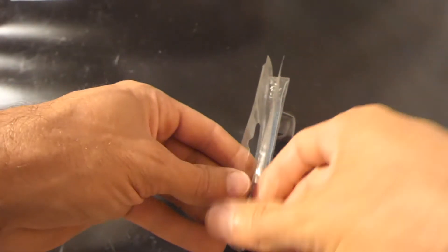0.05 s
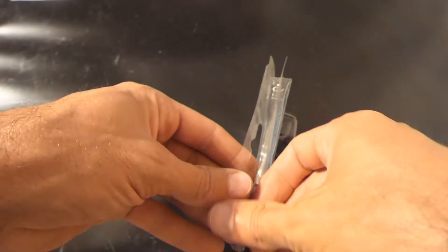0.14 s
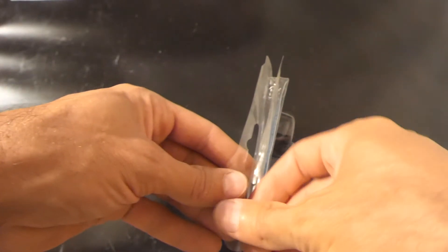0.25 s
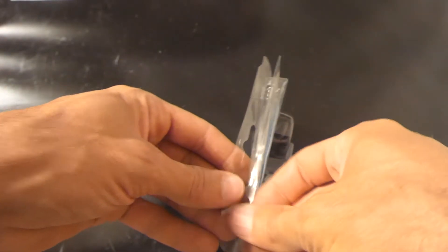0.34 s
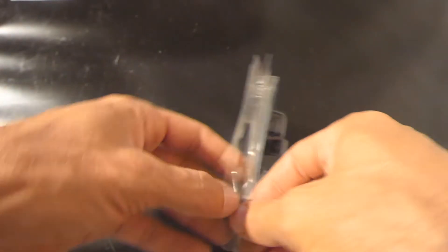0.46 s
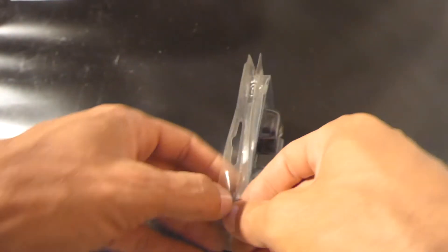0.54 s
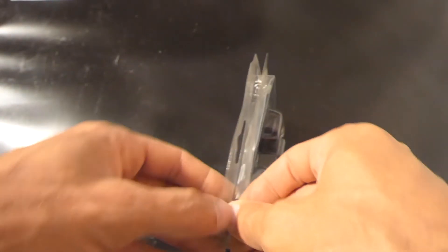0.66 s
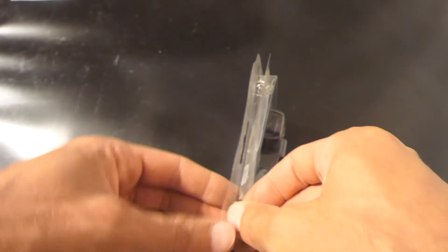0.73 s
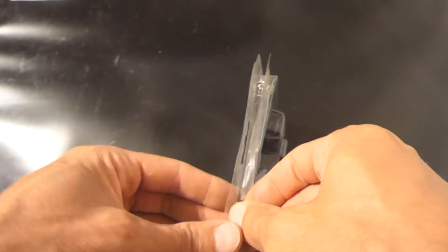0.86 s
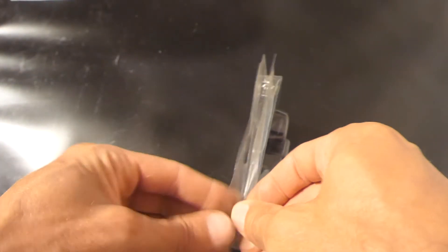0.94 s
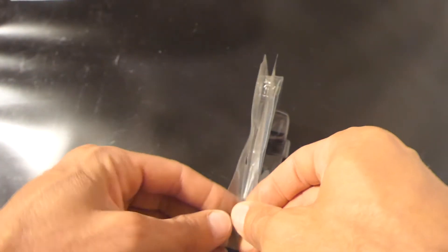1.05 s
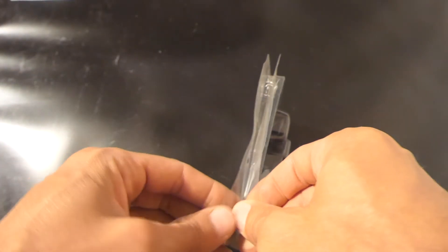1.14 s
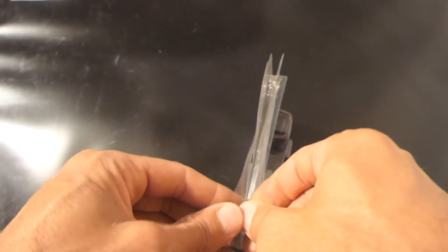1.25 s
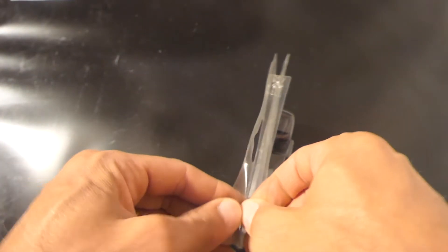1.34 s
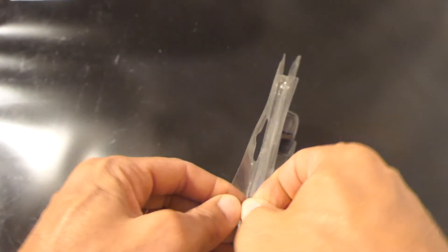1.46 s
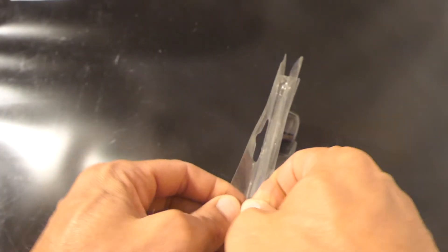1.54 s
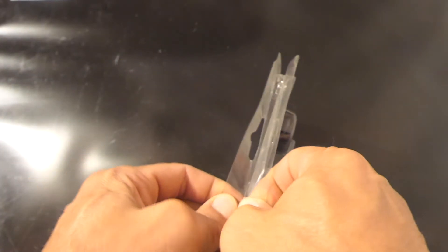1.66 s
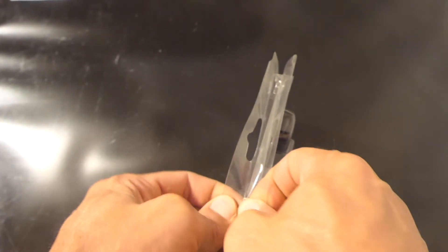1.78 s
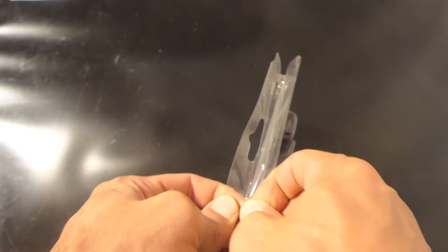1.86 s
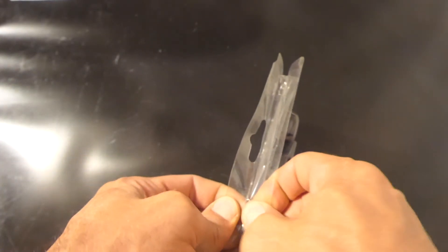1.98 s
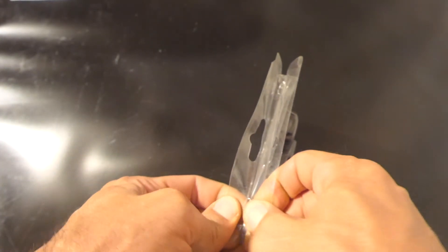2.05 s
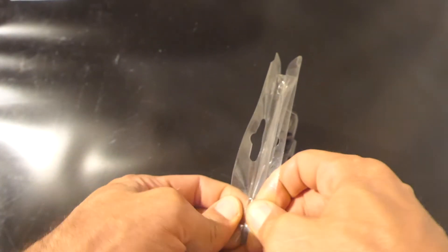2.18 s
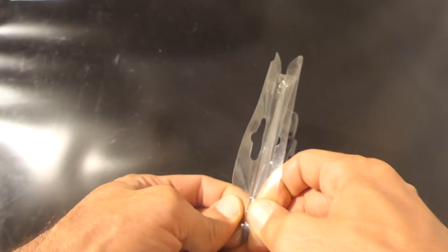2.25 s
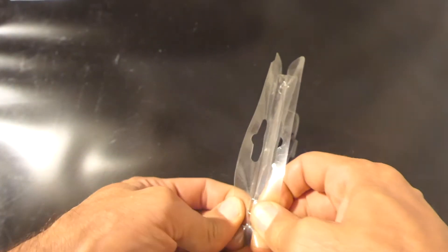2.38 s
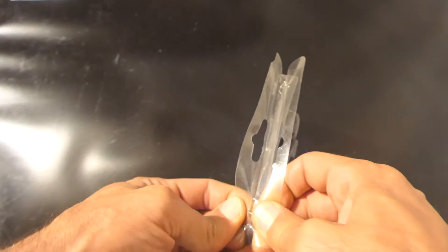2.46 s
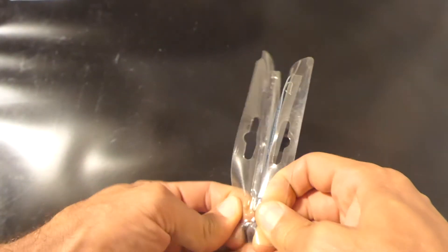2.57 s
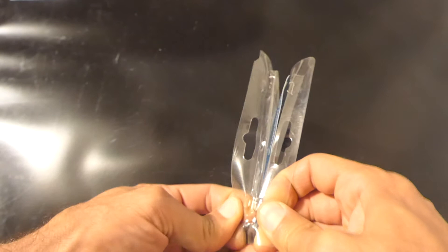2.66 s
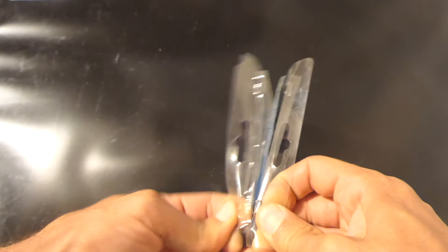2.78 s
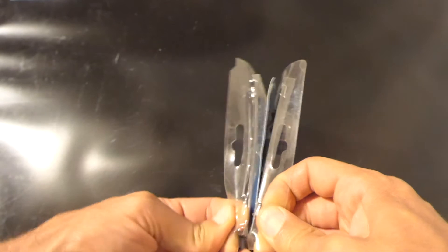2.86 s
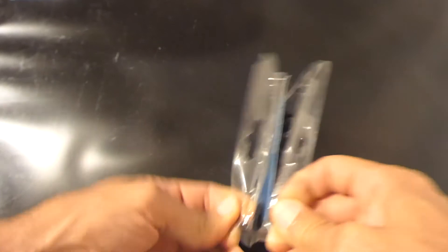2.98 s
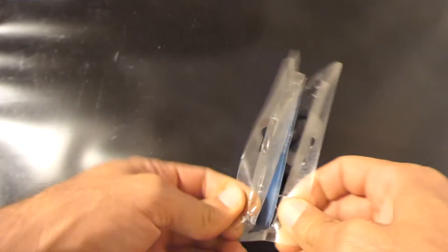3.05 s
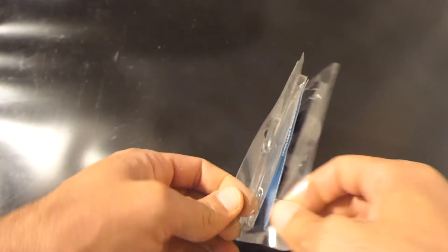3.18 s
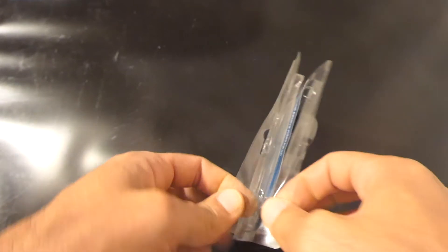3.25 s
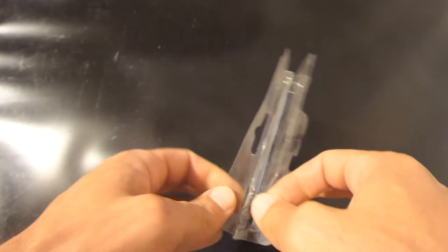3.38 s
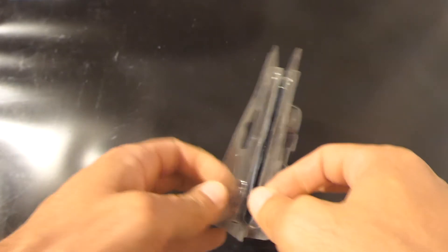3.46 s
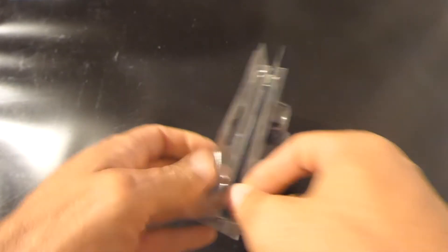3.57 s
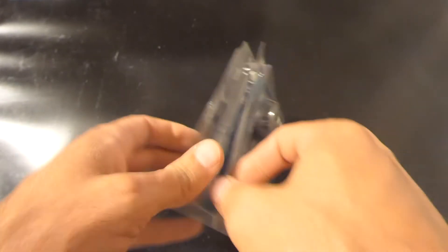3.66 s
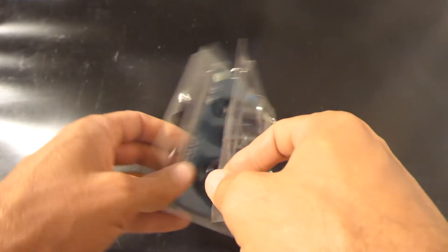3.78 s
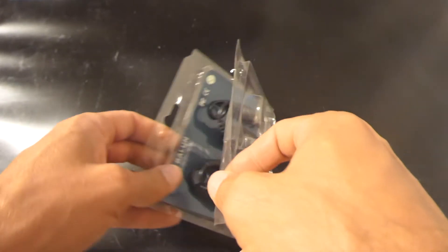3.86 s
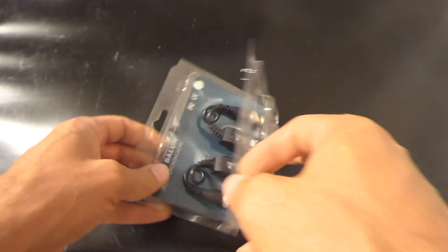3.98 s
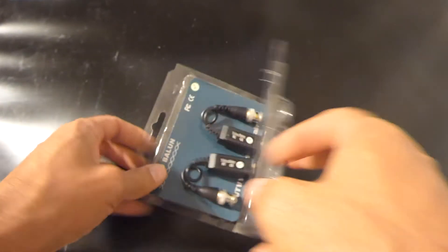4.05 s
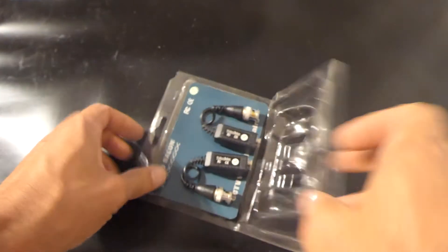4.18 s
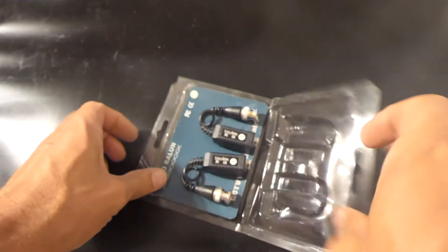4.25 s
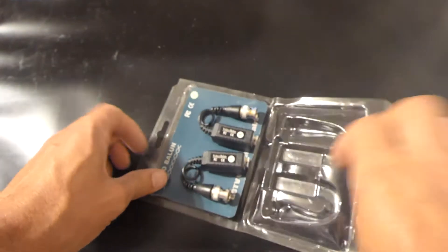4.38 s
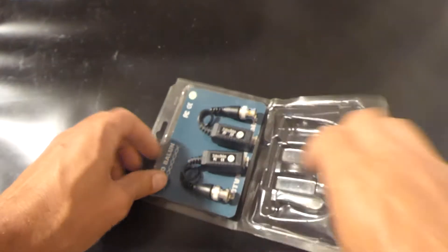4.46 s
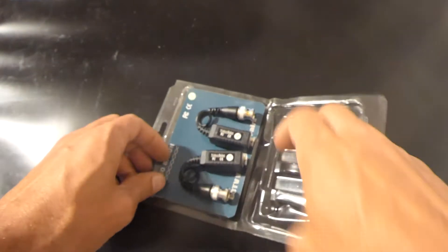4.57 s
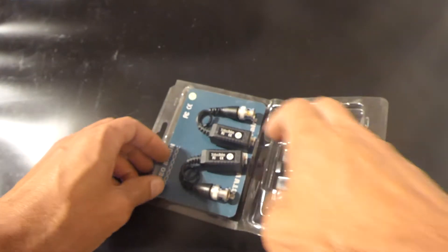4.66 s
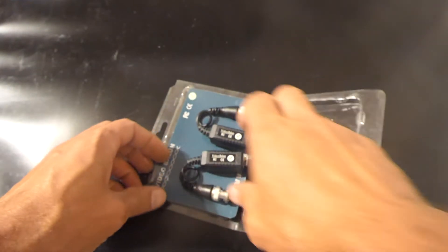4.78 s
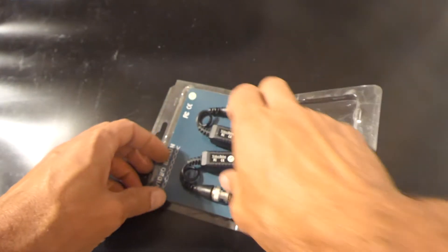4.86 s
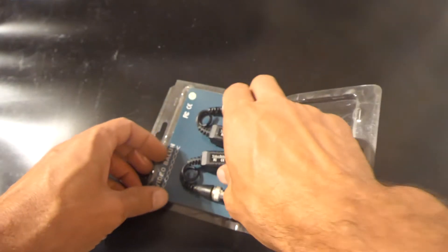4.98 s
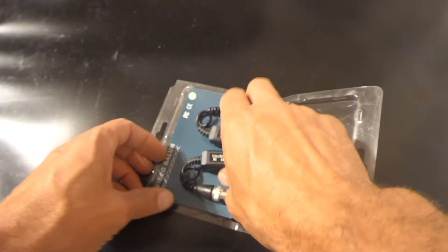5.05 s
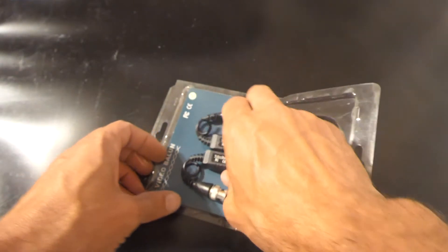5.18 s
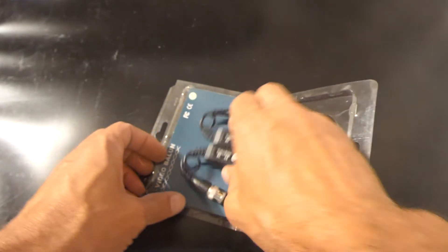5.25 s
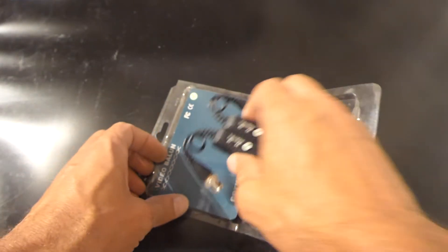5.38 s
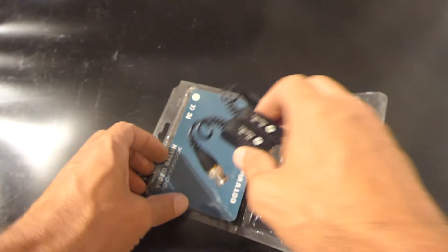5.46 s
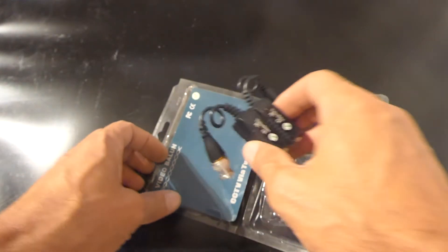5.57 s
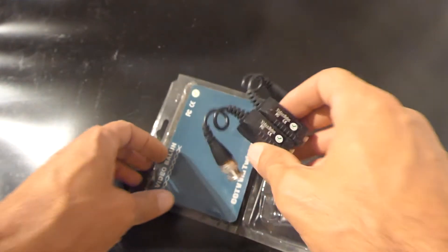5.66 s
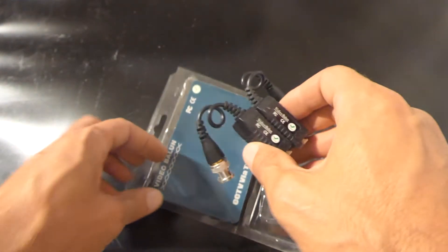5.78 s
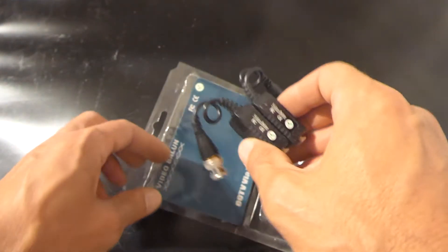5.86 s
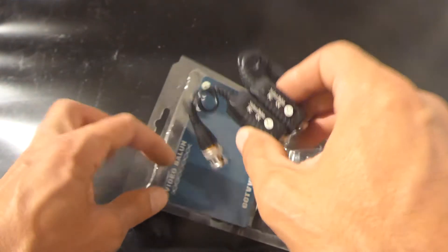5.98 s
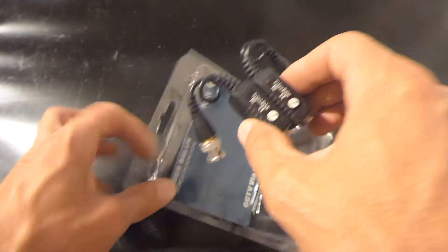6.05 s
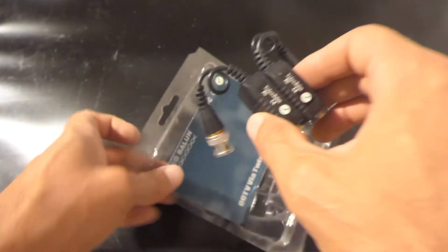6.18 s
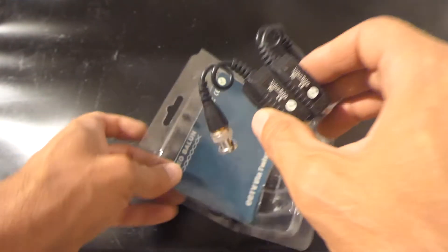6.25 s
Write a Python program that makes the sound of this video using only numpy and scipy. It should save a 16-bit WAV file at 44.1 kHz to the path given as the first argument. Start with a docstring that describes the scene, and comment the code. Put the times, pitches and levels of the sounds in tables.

```python
"""Two hands pry open a clear plastic blister pack over a table, close up in a small, softly rushing room.
First fingers slide and tap on the shut pack, drawing its hollow tone, and nudge it against the table.
The film crinkles, an edge drags, and from about 2 s the press studs let go with sharp snaps.
At 2.7 s the lid opens and the hollow tone goes up an octave; scrapes, taps and knocks grow busier as a
part is pulled from its tray, ending on a snap at 6.2 s. The thin shell colours every snap and scrape."""
import sys
import numpy as np
from scipy import signal
from scipy.fft import rfft, irfft, next_fast_len
from scipy.io import wavfile
from scipy.ndimage import uniform_filter1d, map_coordinates

SR = 44100
rng = np.random.default_rng(int(sys.argv[2]) if len(sys.argv) > 2 else 0)


def put_to_file(sound):
    """Save the sound as 16-bit audio at rate SR, in the file named by the first command-line argument."""
    columns = np.atleast_2d(sound).T  # one column per channel
    safe = np.clip(columns, -1, 1)
    whole_steps = np.round(safe * 32767)
    wavfile.write(sys.argv[1], SR, whole_steps.astype(np.int16))


N = 278712

# tone curves of room air, plastic scrape, skin hiss and table shuffle: freq_hz, level_db
AIR_SPECTRUM = [(25, -27.5), (80, -16.5), (150, -17), (270, -12), (520, -12.5), (740, -10.5), (1180, -13),
                (1500, -17.5), (2200, -23), (6000, -43.5), (11000, -28.5), (16000, -36)]
SCRAPE_SPECTRUM = [(300, -15.5), (550, -23), (780, -4), (1200, 1.5), (1650, 3), (2400, -1.5), (3300, -5),
                   (6000, -11), (12000, -43.5)]
SKIN_SPECTRUM = [(1200, -35), (2500, -2.5), (3500, -4), (5500, 1.5), (7500, -4), (9800, -2.5),
                 (12500, -12.5), (15000, -19), (16500, -28.5)]
SHUFFLE_SPECTRUM = [(25, -38.5), (55, -31), (80, -10), (115, -4.5), (150, 2), (210, 1.5), (290, -7),
                    (370, 1.5), (480, -20.5), (700, -2.5), (1500, -61.5)]
# strokes of plastic on plastic, skin on film, pack on table and pinched film: start_s, length_s, level_db
SCRAPES = [(0.0, 0.097, -61), (0.32, 0.036, -57.5), (0.42, 0.35, -67), (1.14, 0.077, -58),
           (1.42, 0.21, -67), (1.65, 0.065, -62.5), (2.05, 0.32, -62.5), (2.7, 0.21, -56.5),
           (2.94, 0.086, -52.5), (3.3, 0.076, -50), (3.39, 0.24, -60), (3.72, 0.072, -45.5),
           (4.0, 0.42, -57.5), (4.188, 0.039, -34.5), (4.475, 0.066, -46.5), (4.55, 0.062, -47),
           (4.64, 0.19, -58), (4.8, 1, -64), (5.29, 0.22, -55), (5.73, 0.3, -55.5), (5.95, 0.06, -45.5),
           (6.05, 0.26, -52)]
SLIDES = [(0.0, 0.14, -62), (0.325, 0.054, -58), (0.4, 0.11, -61.5), (0.595, 0.053, -58.3),
          (0.705, 0.059, -58.5), (0.955, 0.044, -57), (1.14, 0.086, -58), (1.29, 0.046, -64),
          (1.41, 0.37, -73), (2.78, 0.33, -57.5), (3.28, 0.094, -56), (3.51, 0.1, -63), (3.735, 0.053, -49),
          (3.93, 0.32, -57.5), (4.495, 0.049, -49.5), (4.55, 0.085, -50.5), (4.62, 0.21, -63.5),
          (5.3, 0.17, -58.5), (5.63, 0.29, -63.5), (5.92, 0.1, -50.5), (6.06, 0.075, -54.5)]
SHUFFLES = [(0.32, 0.075, -62.5), (1.14, 0.11, -61.5), (1.29, 0.11, -65), (1.52, 0.28, -70.5),
            (2.7, 0.47, -63.5), (2.97, 0.087, -59), (3.11, 0.15, -61.5), (3.3, 0.13, -62.5),
            (3.75, 0.33, -70), (4.21, 0.15, -60), (4.52, 0.17, -58.5), (5.1, 0.13, -65),
            (6.07, 0.27, -57.5)]
CRINKLES = [(1.3, 0.26, -69.5), (1.66, 0.14, -67.5), (2.94, 0.073, -49), (3.745, 0.057, -45),
            (4.04, 0.23, -57.5), (4.49, 0.14, -50.5), (6.0, 0.18, -54.5)]
# resonances of the thin shell: pitch_hz, width_hz, level_db
SHELL_MODES = [(757, 93, 4), (1236, 55, 4), (1550, 22, 2), (2183, 180, 1), (2410, 55, -1.5),
               (2938, 93, 3.5), (3400, 270, -3), (4050, 180, 1.5), (4600, 110, -1), (4920, 320, -2),
               (5740, 580, -4.5), (9720, 500, -1.5)]
# the pack knocks on the table: start_s, push_db, favoured_hz
KNOCKS = [(0.041, -51.5, 336), (0.329, -57, 143), (0.335, -55.5, 400), (1.143, -43.5, 163),
          (2.559, -35, 210), (2.59, -39, 165), (3.048, -44, 100), (3.334, -44.5, 239), (3.727, -47, 368),
          (3.815, -45.5, 259), (3.905, -47.5, 230), (4.199, -44, 221), (4.304, -53, 243), (4.489, -39, 95),
          (4.547, -42, 213), (4.584, -41.5, 115), (6.108, -48, 187), (6.238, -40, 130)]
# low modes of the pack lying on the table: pitch_hz, level_db, t60_s
KNOCK_MODES = [(78, -11, 0.16), (110, -6.5, 0.053), (144.4, -3, 0.26), (193, -0.5, 0.13),
               (227.8, -1.5, 0.15), (257.2, 1, 0.12), (305, -1.5, 0.13), (376, 0, 0.21), (397.6, 1.5, 0.15)]
# a finger or the lid taps the shell: start_s, level_db, crack_db
TAPS = [(0.043, -45, -19.5), (0.328, -56, -23), (0.5928, -52, -7), (1.063, -46.5, 5), (1.146, -41, -27),
        (1.3622, -54.5, -11), (1.685, -51.5, -20), (1.736, -57, -25), (1.762, -63, -14),
        (1.7887, -53.5, -7), (1.814, -56.5, -10), (2.089, -50.5, -18), (3.145, -43, -20),
        (3.1716, -38.5, -34), (3.338, -44, -14), (3.526, -47, -19), (3.575, -46, -15.5), (3.7468, -39, -20),
        (3.8253, -33.5, -26), (3.9062, -35, -30), (3.911, -38, -36), (4.201, -29.5, -25),
        (4.3055, -41.5, -44), (4.4876, -40, -29), (4.5, -40, -15), (4.5469, -38, -20), (4.5621, -29, -19),
        (4.603, -34, -19.5), (4.659, -43, -27), (4.977, -52.5, -31), (5.6724, -51.5, -26),
        (5.9644, -44, -28), (6.012, -39, -29), (6.055, -46, -14), (6.102, -39, -11.5), (6.2172, -43, -13),
        (6.2355, -28.5, -15)]
# the sheet buckles or a stud lets go: start_s, level_db, pitch_hz, half_width_octaves, crack_db, t60_s
SNAPS = [(0.141, -50, 1980, .36, -6, 0.033), (0.311, -53, 4000, 2.3, 5, 0.0052),
         (1.132, -50, 7340, 0.55, -13, 0.0056), (1.1406, -40, 1740, 0.45, -17, 0.045),
         (1.942, -51.5, 1530, 0.65, -38, 0.01), (1.9734, -30, 2300, 0.59, -10, 0.022),
         (2.1642, -49, 1560, 1.1, -41, 0.01), (2.2325, -50.5, 1490, 1.5, -32, 0.0043),
         (2.2752, -41.5, 5700, 0.96, -4.5, 0.023), (2.544, -41, 5880, 1.1, 7, 0.11),
         (2.5576, -20.5, 4050, 0.94, -15, 0.016), (2.562, -22, 4470, 0.067, -21, .006),
         (2.572, -30, 9650, .6, -12, .004), (2.558, -21, 9600, 0.44, -20, 0.0015),
         (2.5591, -19.5, 1430, 3.4, -25.5, 0.011), (2.7463, -32.5, 2000, 0.8, -12.5, 0.017),
         (2.765, -33, 3100, 0.86, -8, 0.0031), (2.862, -42.5, 9000, 0.52, -7, 0.0039),
         (2.873, -39, 3660, 0.089, -13, 0.018), (2.928, -40, 4140, 0.42, -5, 0.011),
         (3.033, -32, 3500, 1.5, -20, 0.014), (3.0484, -17, 4000, 0.31, -24.5, 0.006),
         (3.0487, -20.5, 2040, 0.27, -34, 0.032), (3.2126, -30, 3800, 0.45, -15.5, 0.0082),
         (3.288, -42.5, 2140, 1.7, -40, 0.005), (3.4034, -36, 3320, 1.14, -29, 0.0027),
         (3.722, -42.5, 1890, 4.7, -37, 0.006), (3.815, -28, 1280, 0.8, -17.5, 0.0041),
         (3.8308, -32.5, 5200, 3.3, -12, 0.0048), (3.9078, -41, 3170, 0.15, -20, 0.012),
         (3.9098, -45.5, 706, 0.14, -30, 0.017), (4.1985, -27, 1880, 1.36, -32, 0.027),
         (4.2063, -36, 1090, 0.29, -22, 0.014), (4.337, -37.5, 3020, 1.15, -32, .004),
         (5.112, -49.5, 4000, 1.7, -16.5, .01), (5.1167, -36.5, 1710, 1.94, -32, 0.0051),
         (5.161, -29, 5240, 2.7, -20, 0.0029), (5.1602, -38, 1120, 0.36, -27, 0.0041),
         (5.977, -34.5, 1500, 0.42, -18, 0.016), (5.977, -35.5, 5300, 0.17, -20, 0.011),
         (6.2363, -24.5, 4470, 0.57, -12, 0.018)]
# an edge drags and rings: start_s, length_s, level_db, pitch_hz, width_hz
DRAGS = [(1.979, 0.045, -47, 2550, 262), (3.758, 0.17, -51, 1640, 240), (4.03, 0.14, -55, 1510, 260),
         (5.655, 0.17, -58.5, 1590, 150), (5.74, 0.2, -63, 2680, 380), (6.011, 0.02, -45, 3270, 120)]
# where the fingers work: time_s, left_minus_right_db
PAN = [(0, -4), (1.1, -3), (2.0, -4.5), (2.55, -2.2), (3.05, -3.5), (3.7, 0), (4.3, -2.5), (6.3, 0.8)]
# decay of the room: freq_hz, t60_s
ROOM_DECAY = [(150, 0.23), (400, 0.13), (1040, 0.22), (2760, 0.21), (7280, 0.22), (15000, 0.058)]
# tone of the room's tail: freq_hz, gain_db
ROOM_TONE = [(150, 1.5), (500, 3.5), (1200, -3.5), (2500, -2.5), (4200, -3.5), (7000, -3.5), (11000, -0.5),
             (16000, -1.5)]
# how alike left and right are in diffuse sound: freq_hz, correlation
STEREO_LIKENESS = [(40, 0.42), (130, 0.21), (1400, 0.22), (4000, 0.53), (8000, 0.5), (14000, 0.27)]

# hollow tone of the shut pack and the open tray: pitch_hz, width_hz, boost_db
SHUT, OPEN = (800, 400, 10.6), (1603, 100, 6.5)
OPENS_AT_S = 2.7
# the sheet heard from one side and all round: even_band_hz, dense_db, blur_octaves, smear_s, clean_db
ONE_SIDE, ALL_ROUND = (1200, -4.5, 0, 0, -23.5), (100, 4.5, 0.3, 0.1245, -1)


def amp(db):
    """Decibels to gain."""
    return 10 ** (np.asarray(db) / 20)


def unit(x):
    """Scale to rms 1."""
    return x / np.sqrt(np.mean(x ** 2) + 1e-20)


def along(points, hz):
    """Read a curve on a log frequency axis."""
    freqs, values = np.transpose(points)
    return np.interp(np.log(hz + 1), np.log(freqs + 1), values)


def wobble(rate_hz):
    """A smooth random modulator."""
    return map_coordinates(rng.standard_normal(int(N * rate_hz / SR) + 4), [np.arange(N) * rate_hz / SR])


def add(out, start_s, wave):
    """Mix a short wave into a track."""
    span = out[round(start_s * SR):][:len(wave)]
    span += wave[:len(span)]


def filtered(x, response):
    """Equalise x with a gain that depends on frequency."""
    size = next_fast_len(x.shape[-1] + SR // 4)
    return irfft(rfft(x, size) * response(np.fft.rfftfreq(size, 1 / SR)), size)[..., :x.shape[-1]]


def causal(gain):
    """The minimum-phase response with this gain: nothing sounds before the blow."""
    cepstrum = irfft(np.log(np.maximum(gain, 1e-6)))
    half = len(cepstrum) // 2
    cepstrum[1:half] *= 2
    cepstrum[half + 1:] = 0
    return np.exp(rfft(cepstrum))


def coloured(x, gain, size=8192):
    """Colour x without pre-ringing, rms 1."""
    response = irfft(causal(gain(np.fft.rfftfreq(size, 1 / SR))))
    return unit(signal.oaconvolve(x, response)[:N])


def spread(pair):
    """Turn two unrelated signals into left and right of a diffuse sound."""
    angle = lambda hz: np.arccos(np.clip(along(STEREO_LIKENESS, hz), -1, 1)) / 2
    mid, side = filtered(pair, lambda hz: np.array([np.cos(angle(hz)), np.sin(angle(hz))]))
    return np.array([mid + side, mid - side])


def resonance(hz, pitch_hz, width_hz, db):
    """Power curve of one resonant peak."""
    return amp(db) ** 2 / (1 + (2 * (hz - pitch_hz) / width_hz) ** 2)


def shell(hz, dense_db):
    """Gain of the shell: its resonances over a flat bed of dense modes."""
    return np.sqrt(sum(resonance(hz, *mode) for mode in SHELL_MODES) + amp(dense_db) ** 2)


def friction(slips_per_s, scatter_db, hiss_db):
    """Tiny slips of uneven size over a smooth hiss, rms 1."""
    sizes = amp(scatter_db * np.minimum(rng.exponential(size=N), 4))
    slips = (rng.random(N) < slips_per_s / SR) * sizes * rng.choice([-1, 1], N)
    return unit(unit(slips) + amp(hiss_db) * rng.standard_normal(N))


def strokes(rows, rest_db, edge_db, steepness=2.3):
    """Rubbing envelope: strokes peak midway and fall by edge_db at the ends, over a faint resting stir."""
    t = np.arange(0, N, 32) / SR
    power = amp(rest_db) ** 2
    for start_s, length_s, db in rows:
        from_middle = 2 * (t - start_s) / length_s - 1
        power = power + amp(db + edge_db * np.abs(from_middle) ** steepness) ** 2
    return np.interp(np.arange(N) / SR, t, np.sqrt(power))


def air(level_db=-68):
    """The faint steady rush of the room, like a distant fan."""
    rush = filtered(rng.standard_normal((2, N)), lambda hz: amp(along(AIR_SPECTRUM, hz)))
    return amp(level_db) * unit(spread(rush))


def hollow_rub(cavity, hiss_db, flex_octaves, overtone_ratio=1.76, overtone_db=-10.5):
    """Friction sounds through the shell, whose hollow tone shifts as it flexes."""
    pitch_hz, width_hz, boost_db = cavity
    out = np.zeros(N)
    for flex in (-1, 0, 1):
        tone_hz = pitch_hz * 2 ** (flex * flex_octaves)
        hollow = lambda hz: np.sqrt(1 + resonance(hz, tone_hz, width_hz, boost_db)
                                    + resonance(hz, tone_hz * overtone_ratio, width_hz,
                                                boost_db + overtone_db))
        colour = lambda hz: amp(along(SCRAPE_SPECTRUM, hz)) * shell(hz, dense_db=1) * hollow(hz)
        slips = friction(slips_per_s=300, scatter_db=2, hiss_db=hiss_db)
        out += amp(3.5 * wobble(35) - 3.4 * abs(flex)) * coloured(slips, colour)
    return unit(out)


def scrapes(grip):
    """Plastic scrapes on plastic; the shut tone crossfades to the open one as the lid swings away."""
    opened = np.clip(np.arange(N) / SR - OPENS_AT_S, 0, 1)
    shut_pack = np.sqrt(1 - opened) * hollow_rub(SHUT, hiss_db=-6, flex_octaves=0.13)
    open_tray = np.sqrt(opened) * hollow_rub(OPEN, hiss_db=-2, flex_octaves=0.12)
    return strokes(SCRAPES, rest_db=-78, edge_db=-7) * amp(1.4 * grip) * (shut_pack + open_tray)


def slides(grip):
    """Skin slides over the film: dense, fine slips make a bright hiss."""
    slips = friction(slips_per_s=3800, scatter_db=3.5, hiss_db=-5)
    hiss = coloured(slips, lambda hz: amp(along(SKIN_SPECTRUM, hz)))
    return strokes(SLIDES, rest_db=-76, edge_db=-6.5) * amp(0.9 * grip) * hiss


def knocks(rise_s=0.0025, trim_db=-1, favour_db_per_octave=8, low_hz=65):
    """The pack recoils on the table: one push starts its low modes, most those near the contact's pitch."""
    out, t = np.zeros(N), np.arange(SR // 2) / SR
    hz, db, t60_s = np.transpose(KNOCK_MODES)[:, :, None]
    attack = 1 - np.exp(-t / rise_s)
    low_cut = signal.butter(3, low_hz, "high", fs=SR, output="sos")  # the knocks carry no deep bass
    for start_s, push_db, favoured_hz in KNOCKS:
        octaves_off = np.abs(np.log2(hz / favoured_hz))
        mode_db = db + rng.normal(0, 1, hz.shape) - favour_db_per_octave * octaves_off
        ring = np.sum(amp(mode_db - 60 * t / t60_s) * np.sin(2 * np.pi * hz * t), axis=0)
        add(out, start_s, amp(push_db + trim_db) * signal.sosfilt(low_cut, ring * attack))
    return out


def click(db, pitch_hz, octaves, crack_db, t60_s, view,
          ring_db=-26, ring_t60_s=0.11, low_hz=680, high_hz=11000, body_db=-32, size=4096):
    """A blow shakes a patch of sheet: a small stiff patch sounds high, a wide panel low."""
    t, hz = np.arange(1, size + 1) / SR, np.fft.rfftfreq(size, 1 / SR) + 1
    even_band_hz, dense_db, blur_octaves, smear_s, clean_db = view
    # dense modes die fast; the rest of the pack rings on weakly
    decay = amp(-60 * t / (t60_s + smear_s)) + amp(ring_db - 60 * t / ring_t60_s)
    attack = 1 - np.exp(-20 * t / t60_s)  # a slow buckle starts more softly than a clean break
    burst = rfft(unit(rng.standard_normal(size) * decay * attack)) / np.sqrt(size)
    burst += amp(db - clean_db)  # above clean_db most of the energy comes in one clean jolt
    band_power = uniform_filter1d(np.abs(burst) ** 2, int(even_band_hz * size / SR) + 1)
    burst /= causal(np.sqrt(np.abs(band_power)))  # the modes share the energy evenly, band by band
    peak = 1 / (1 + (np.log2(hz / pitch_hz) / (octaves + blur_octaves)) ** 2)
    patch = np.hypot(peak, amp(crack_db))  # the crack is a broadband floor under the peak
    radiation = 1 / np.sqrt((1 + (hz / high_hz) ** 10) * (1 + (low_hz / hz) ** 8))
    body = amp(body_db) / (1 + np.log2(hz / 250) ** 4)
    wave = irfft(burst * causal((patch * radiation + body) * shell(hz, dense_db)))
    return amp(db) * unit(wave) * np.sqrt(0.005 * SR / size)  # level as if packed into 5 ms


def taps(view, half_width_octaves=0.26, t60_s=0.022):
    """Taps ring at the hollow tone of the pack, shut or open, each with its own share of crack."""
    out = np.zeros(N)
    for start_s, db, crack_db in TAPS:
        hollow_hz = (SHUT if start_s < OPENS_AT_S else OPEN)[0]
        add(out, start_s, click(db, hollow_hz, half_width_octaves, crack_db, t60_s, view))
    return out


def snaps(view):
    """The sheet buckles or a stud lets go: each snap frees its own patch of sheet."""
    out = np.zeros(N)
    for start_s, db, pitch_hz, octaves, crack_db, t60_s in SNAPS:
        add(out, start_s, click(db, pitch_hz, octaves, crack_db, t60_s, view))
    return out


def shuffles():
    """The pack shifts on the table: coarse slips make a low, bumpy rumble."""
    slips = friction(slips_per_s=220, scatter_db=5, hiss_db=-14)
    rumble = coloured(slips, lambda hz: amp(along(SHUFFLE_SPECTRUM, hz)))
    return strokes(SHUFFLES, rest_db=-76, edge_db=-6.5) * rumble


def crinkles(low_hz=1000, high_hz=7000):
    """Pinched film gives way in tiny, dry, separate cracks."""
    cracks = friction(slips_per_s=220, scatter_db=3, hiss_db=-29)
    rolloff = lambda hz: np.sqrt((1 + (low_hz / (hz + 1)) ** 4) * (1 + (hz / high_hz) ** 4))
    crackle = coloured(cracks, lambda hz: shell(hz, dense_db=0) / rolloff(hz))
    return strokes(CRINKLES, rest_db=-89.5, edge_db=-5.5) * crackle


def drags(edge_db=-7, wander_octaves=0.037):
    """Stick and slip along an edge feeds one thin resonance, which wanders as the sheet flexes."""
    out = np.zeros(N)
    slips = friction(slips_per_s=300, scatter_db=5.5, hiss_db=-2.5) * amp(7.2 * wobble(45))
    flex = 2 ** (wander_octaves * wobble(45))
    for start_s, length_s, db, pitch_hz, width_hz in DRAGS:
        t = np.arange(-length_s, length_s, 1 / SR)  # zero at the middle of the drag
        first = round((start_s - length_s / 2) * SR)
        span = slice(first, first + len(t))
        carrier = np.exp(2j * np.pi * pitch_hz * np.cumsum(flex[span]) / SR)
        # shift down, smooth, shift back: a resonator that follows the pitch
        ring = signal.lfilter([1], [1, -np.exp(-np.pi * width_hz / SR)], slips[span] / carrier) * carrier
        swell = amp(db + edge_db * (2 * t / length_s) ** 2)
        add(out, first / SR, swell * unit(ring.real))
    return out


def table_echo(x, delay_s=0.0036, echo_db=-9):
    """The table top sends everything up once more, a moment later."""
    return x + amp(echo_db) * np.pad(x, round(delay_s * SR))[:N]


def room(x, predelay_s=0.004, positions=12):
    """The walls answer with a short tail, a different one wherever the pack is held."""
    out = np.zeros((2, N + SR))
    lag = round(predelay_s * SR)
    edges = np.linspace(0, N, positions + 1).astype(int)
    for first, last in zip(edges, edges[1:]):
        hz, t, noise = signal.stft(rng.standard_normal((2, SR // 2)), SR, nperseg=256)
        decay = amp(-60 * t / along(ROOM_DECAY, hz)[:, None])
        decay /= np.sqrt(np.mean(decay ** 2, axis=1, keepdims=True) * SR / 2)  # equal energy per band
        tail = signal.istft(noise * decay, SR, nperseg=256)[1]
        wet = signal.fftconvolve(x[None, first:last], tail, axes=1)
        out[:, first + lag:first + lag + wet.shape[1]] += wet
    return filtered(spread(out[:, :N]), lambda hz: amp(along(ROOM_TONE, hz)))


def scene(room_db=-1.44, knock_send_db=-3):
    """Up close one hears one side of the sheet; the walls get the smoother sum of all its sides."""
    grip = wobble(70)  # the contact catches and gives
    rubbing = scrapes(grip) + slides(grip) + shuffles() + drags() + crinkles()
    thuds = knocks()
    pan_db = np.interp(np.arange(N) / SR, *np.transpose(PAN))
    pan = amp(np.array([pan_db, -pan_db]) / 2)
    direct = table_echo(snaps(ONE_SIDE) + taps(ONE_SIDE) + rubbing + thuds) * pan
    room_send = snaps(ALL_ROUND) + taps(ALL_ROUND) + rubbing + amp(knock_send_db) * thuds
    return direct + amp(room_db) * room(room_send) + air()


def record(dry, ceiling=0.95, top_hz=16000):
    """A soft clip rounds off the tallest peaks, then a steep low-pass trims the top."""
    rounded = dry / (1 + np.abs(dry / ceiling) ** 8) ** (1 / 8)
    return filtered(rounded, lambda hz: 1 / np.sqrt(1 + (hz / top_hz) ** 160))


dry = scene()
out = record(dry)
put_to_file(out)
```